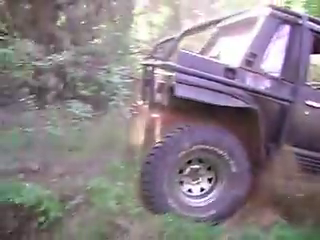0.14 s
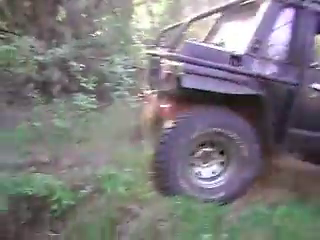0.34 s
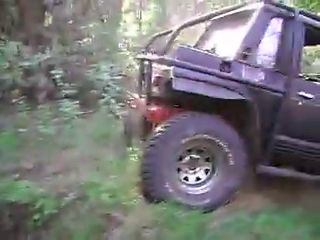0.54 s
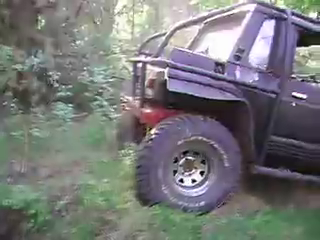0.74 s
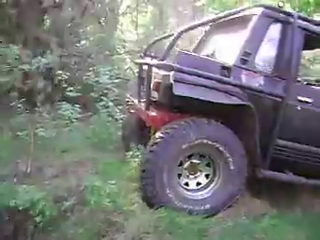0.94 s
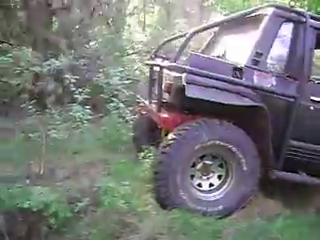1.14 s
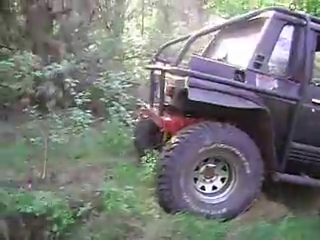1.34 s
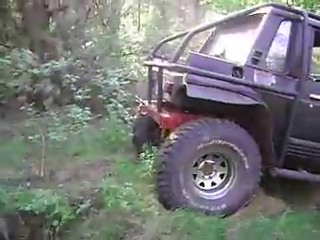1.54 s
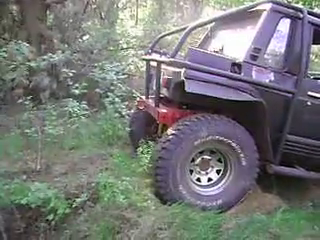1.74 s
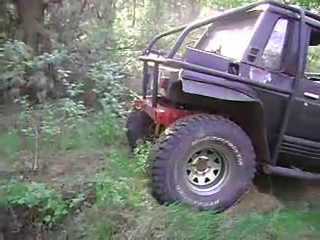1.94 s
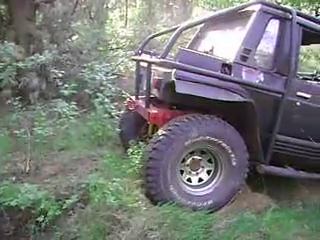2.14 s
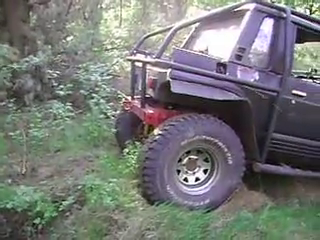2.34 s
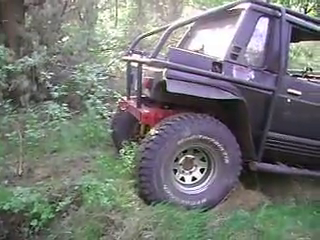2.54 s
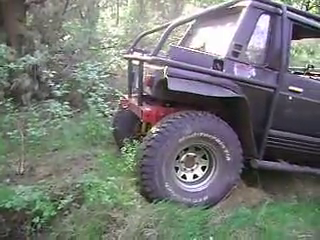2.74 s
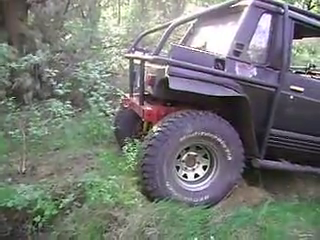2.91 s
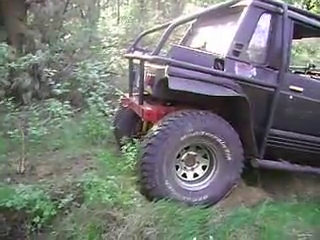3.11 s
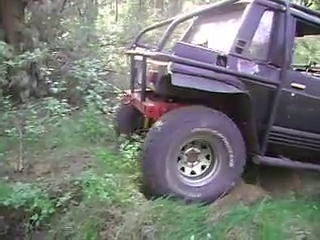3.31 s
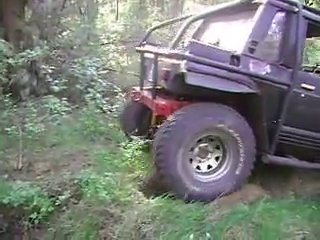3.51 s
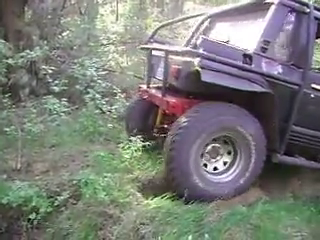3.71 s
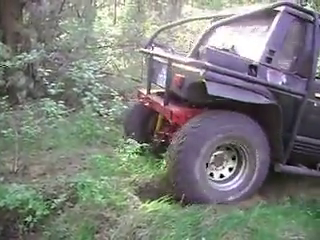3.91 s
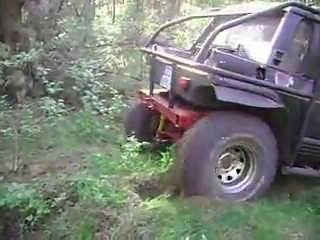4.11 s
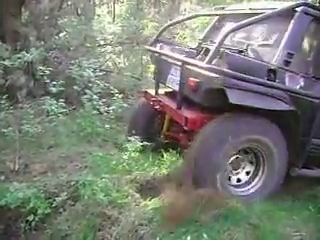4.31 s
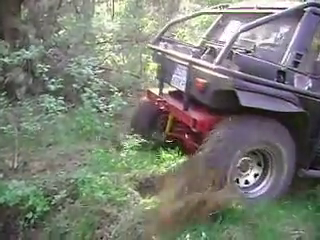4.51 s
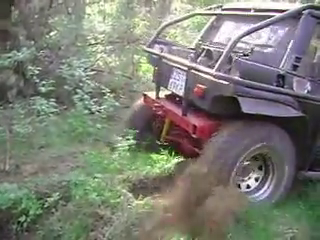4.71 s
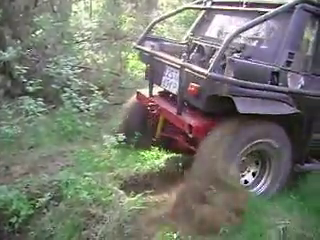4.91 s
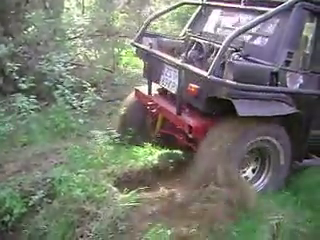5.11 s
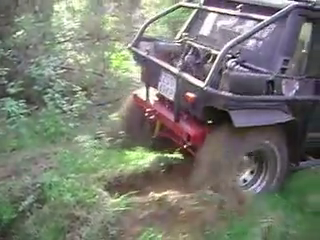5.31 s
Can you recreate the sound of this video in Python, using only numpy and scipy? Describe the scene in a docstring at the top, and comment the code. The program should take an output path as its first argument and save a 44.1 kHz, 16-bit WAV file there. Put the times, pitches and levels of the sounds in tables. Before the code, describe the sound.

A diesel off-road truck drops from a loud rev to a quiet low idle, then roars hard under load, spinning its wheels in dirt.

```python
"""A six-cylinder diesel truck in a forest drops off a rev to idle, then pulls hard and spins its wheels in mud.
Exhaust pulses, a sum of harmonics of the firing rate, drone through the pipe over a roar of noise bursts.
Each combustion excites resonances of the engine block and intake, one cylinder harder than the rest.
Mud splashes as swells of noise, and mud and twigs tick on the body as short wave packets.
A small mono recorder cuts the treble and overloads on the peaks."""
import sys
import numpy as np
from scipy import signal
from scipy.fft import rfft, irfft, next_fast_len
from scipy.io import wavfile
from scipy.ndimage import uniform_filter1d

SR = 44100
rng = np.random.default_rng(int(sys.argv[2]) if len(sys.argv) > 2 else 0)


def elevation(decibels):
    """Turn decibel levels (scalar or array-like) into linear amplitude ratios."""
    levels = np.asarray(decibels, float)
    return 10 ** (levels / 20)


def bounce(signal):
    """Save signal as a 16-bit WAV file at the path given by the first command-line argument."""
    frames = np.transpose(np.atleast_2d(signal))
    limited = np.clip(frames, -1, 1)
    pcm = np.round(limited * 32767).astype(np.int16)
    wavfile.write(sys.argv[1], SR, pcm)


N = 236111

# Engine speed. Each row: time in seconds, firings per second.
FIRING_RATE = [(0, 109.51), (.05, 105.2), (.12, 88.81), (.253, 76.64), (.531, 64.42), (1.201, 41.0),
               (1.485, 33.44), (1.689, 32.15), (1.933, 32.97), (2.789, 31.29), (2.909, 39.16),
               (3.112, 66.63), (3.258, 79.16), (3.382, 84.6), (3.604, 78.83), (3.782, 80.29), (4.331, 78.3),
               (4.631, 78.7), (4.885, 74.67), (5.354, 71.81)]
# Engine load. Each row: time in seconds, load from 0 to 1.
ENGINE_LOAD = [(0, 0), (2.8, 0), (3.0, 1), (5.354, 1)]
# Source levels before a fixed trim. Each row: time in seconds, exhaust tones in dB, exhaust roar in dB,
# block clatter in dB.
SOURCE_LEVELS = [(0, -29.5, -12.5, -16.5), (.09, -29.5, -20.5, -23.5), (.24, -41, -22.5, -28.5),
                 (.31, -37, -21.5, -27), (.45, -42.5, -28.5, -32.5), (.75, -45, -33, -35),
                 (1.15, -49.5, -37, -37.5), (1.26, -49, -38, -36.5), (1.47, -54, -40.5, -38),
                 (1.75, -55.5, -39, -38.5), (2.3, -48, -37.5, -38), (2.65, -45.5, -39, -38.5),
                 (2.8, -46.5, -36.5, -40), (2.97, -31.5, -30, -20), (3.07, -30.5, -25, -15),
                 (3.18, -24.5, -23.5, -16.5), (3.39, -26.5, -22.5, -18), (3.46, -32, -26.5, -25),
                 (3.63, -27, -25, -21.5), (3.74, -25.5, -24.5, -17), (4.3, -24, -24.5, -17),
                 (4.9, -24.5, -26, -16), (5.354, -25.5, -27, -18)]

# The main exhaust tones, in multiples of the firing rate.
TONE_MULTIPLES = [1, 1.5, 2, 3, 4]
# Balance of those tones. Each row: level coasting in dB, dB added under load,
# dB added as the pipe turns this way.
TONE_BALANCE = [(-1.3, 10, -5.5), (-4, 3.5, -3), (5, -2, 0.9), (2, -2.5, 4.5), (-1.5, -8, 2)]
# The silencer colours those tones. Each row: frequency in Hz, gain in dB.
SILENCER_GAIN = [(30, 0), (50, -3), (75, -3), (100, 3.5), (125, 4), (150, 0), (185, 1.4), (225, 4.5),
                 (270, -0.5), (330, 4.5), (440, -7.5)]
# The pipe mutes the higher tones, against the roar. Each row: frequency in Hz, gain in dB.
PIPE_GAIN = [(150, -6.5), (200, -5), (235, -10), (260, -37), (325, -10.5), (400, -28), (700, -29)]
# Single tones swell for a while, probably body panels humming along. Each row: multiple of the firing rate,
# centre in seconds, half-width in seconds, level in dB before the trim of the tones.
PANEL_HUM = [(10, 2.55, .32, -43.5), (2.5, .6, .17, -35), (4, .29, .08, -29), (3, .03, .06, -27),
             (3, .92, .13, -39), (3, 1.3, .08, -45), (4.6, 3.42, .13, -29), (4.65, 3.9, .35, -34),
             (2.5, 4.1, .6, -35)]
# Spectrum of the exhaust roar. Each row: frequency in Hz, relative level in dB per Hz.
ROAR_SPECTRUM = [(12, -51), (20, -22), (56, -4.5), (140, -4.5), (191, -1), (233, -4), (362, -4.5),
                 (602, -7.5), (937, -14), (1000, -11), (1300, -33), (2200, -120)]
TURN_START_S, TURN_S = 4.0, 1.35  # the truck slews round while the wheels spin
# The low rumble thins out when coasting above idle, and under load, where the tones take over.
IDLE_PER_S, COAST_PER_S = 32, 14  # firings per second
COAST_RUMBLE_DB, LOAD_RUMBLE_DB = -11, -2

# Spectrum of the metallic clatter and of the mud. Each row: frequency in Hz, relative level in dB per Hz.
CLATTER_SPECTRUM = [(410, -24), (700, -14), (946, -12), (1080, -14), (1280, -10), (1480, -10.5),
                    (2810, -9.5), (3320, -13), (4950, -17.5), (5800, -15.5), (7540, -60), (12800, -120)]
# Block modes, half of which swell as the truck turns. Each row: frequency in Hz, width in Hz,
# mean level in dB against the wide clatter, loudest moment in seconds, half-width in seconds.
BLOCK_MODES = [(1808, 11, -12.5, 3.37, .3), (1734, 130, -10, 5.2, 0.25), (1960, 71, -4.5, 4.49, 0.2),
               (2200, 98, -10.5, 3.97, 0.36), (2492, 45, -1.5, 3.05, 0.17), (2402, 29, -9.5, 4.35, 0.19),
               (2443, 48, -5.5, 5.4, 0.51), (2755, 52, -11, 4.57, 1.2), (2744, 60, -9, 3.1, 0.2),
               (2850, 85, -12, 4.74, 0.16), (2995, 61, -13.5, 5.03, 0.41), (2300, 160, -19.5, 1.9, 3.3),
               (2570, 140, -21.5, 1.83, 0.44), (4790, 170, -17, 5.7, 2.7), (2650, 220, -6, 0.03, 0.22),
               (1280, 500, -8.5, 3.95, 0.34)]
# Knock of each cylinder at full load, in dB, in firing order.
CYLINDER_KNOCK = [5, 0.5, 6, -15, 9.5, -2]
# Firings that knock harder or softer than usual. Each row: time in seconds, extra level in dB.
UNUSUAL_KNOCKS = [(2.943, 8.5), (3.025, 7.5), (3.058, 3.5), (3.23, 1.5), (3.449, 3), (3.526, -1),
                  (4.2, 6.5), (4.278, -1), (4.979, 4)]
# Pitch of the intake ring. Each row: time in seconds, frequency in Hz.
RING_PITCH = [(0, 1183), (2.6, 1170), (3.2, 1126), (3.58, 1168), (3.7, 1020), (4.15, 1058), (4.5, 1106),
              (5.354, 1085)]
# The intake ring flares or dips briefly. Each row: centre in seconds, half-width in seconds, change in dB.
RING_FLARES = [(.3, 0.017, 6.5), (.37, 0.033, -11), (3.2, .04, 4.5), (3.3, 0.025, -7), (3.39, 0.018, 3),
               (3.46, 0.024, -4)]
# Intake ring against the tabulated roar level; it builds a little after the load.
RING_DB, RING_LOAD_DB, RING_LAG_S = -7, 11, 0.31

# Clods of mud hit the wheel arch. Each row: centre in seconds, half-width in seconds, level in dB.
MUD_SPLASHES = [(0.154, 0.012, -19.5), (0.297, 0.0082, -19), (.33, 0.0038, -19.5), (0.352, 0.0015, -33),
                (1.305, 0.027, -31.5), (1.42, 0.0063, -41), (4.75, 0.018, -14.5)]
# Mud and twigs on the body. Each row: centre in seconds, level in dB, pitch in Hz, half-width in cycles.
BODY_TICKS = [(0.2672, -5, 432, 0.64), (.2948, -13, 2300, 1.1), (0.308, -13, 1190, 0.92),
              (0.757, -11, 3020, 0.57), (1.2232, -18, 1270, .9), (1.2287, -15, 1900, 0.61),
              (1.2517, -9.5, 3900, 0.57), (1.316, -22, 1145, 3.7), (1.3444, -13.5, 2800, 0.59),
              (1.3688, -17, 3600, 0.98), (1.549, -11, 3500, 1), (1.6626, -23, 4200, 1.4),
              (2.101, -22, 4300, 1), (2.28, -10, 3350, 0.61)]


def evened(x):
    """Normalisation: scales a signal to rms 1."""
    return x / np.sqrt(np.mean(x ** 2) + 1e-20)


def steady(x, seconds=0.1164):
    """Running normalisation: keeps the slow rms level at 1 whatever the firing rate."""
    return x / np.sqrt(uniform_filter1d(x ** 2, int(seconds * SR)) + 1e-12)


def read(points, hz):
    """Logarithmic interpolation: reads a spectrum on a log frequency axis."""
    f, value = np.transpose(points)
    return np.interp(np.log(hz + 1), np.log(f + 1), value)


def curves(rows):
    """Linear interpolation: one value a sample for each column."""
    s, *columns = np.transpose(rows)
    return [np.interp(np.arange(N) / SR, s, c) for c in columns]


def swell(s, seconds):
    """Gaussian envelope: a bell-shaped rise and fall."""
    return np.exp(-((np.arange(N) / SR - s) / seconds) ** 2)


def wander(seconds):
    """Smoothed noise: a slow random fluctuation of rms 1."""
    return evened(uniform_filter1d(rng.standard_normal(N), int(seconds * SR)))


def colour(x, points):
    """Spectral shaping: multiplies the Fourier transform by a gain curve, then scales to rms 1."""
    size = next_fast_len(N)
    gain = elevation(read(points, np.fft.rfftfreq(size, 1 / SR)))
    return evened(irfft(rfft(x, size) * gain, size)[:N])


def resonate(x, hz, width):
    """Heterodyne resonance: shifts the curve hz down to zero, smooths, and shifts back, with gain 1."""
    turn = np.exp(2j * np.pi * np.cumsum(hz * np.ones(N)) / SR)
    r = np.exp(-np.pi * width / SR)
    smooth = signal.lfilter([1 - r], [1, -r], x / turn)
    return 2 * (turn * smooth).real


def bursts(turns, lag, pattern_db, spread_db, t60, floor):
    """Impulsive excitation: noise jumps at each firing and decays exponentially to a steady floor."""
    count = np.floor(turns - lag).astype(int)
    at = np.flatnonzero(np.diff(count)) + 1
    chance_db = spread_db * rng.standard_normal(400)[:len(at)]
    kicks = np.zeros(N)
    kicks[at] = elevation(pattern_db[count[at] % 6, at] + chance_db)
    fall = np.exp(-np.log(1000) / (t60 * SR))
    envelope = floor + signal.lfilter([1], [1, -fall], kicks)
    return envelope * rng.standard_normal(N)


def exhaust_tones(rate, turns, load, tone_db, roar_db):
    """Fourier synthesis: harmonics add up to one pulse a firing; unequal manifolds add the half order."""
    angle = 2 * np.pi * (turns - .55)
    spread = .23 * (1 - load)  # light pulses leave the pipe drawn out, heavy ones as a sharp peak
    turned = np.clip((np.arange(N) / SR - TURN_START_S) / TURN_S, 0, 1)
    main_db = []
    for k, (db, load_db, turn_db) in zip(TONE_MULTIPLES, TONE_BALANCE):
        balance_db = db + load_db * load + turn_db * turned
        main_db.append(tone_db + balance_db + read(SILENCER_GAIN, k * rate))
    first_db, half_db, second_db, third_db, fourth_db = main_db
    upper_db = [roar_db + read(PIPE_GAIN, k * rate) for k in range(5, 10)]
    pulses = elevation(half_db) * np.sin(1.5 * angle)
    for k, db in enumerate([first_db, second_db, third_db, fourth_db] + upper_db, 1):
        unsteady = (.011 - .006 * load) * k * k * wander(.05)  # phase in radians
        level_db = db + (.45 - .3 * load) * k * wander(.12)
        pulses = pulses + elevation(level_db) * np.cos(k * angle - spread * k * k + unsteady)
    for k, s, span, db in PANEL_HUM:
        pulses = pulses + elevation(db) * swell(s, span) * np.cos(k * angle - spread * k * k)
    return np.sqrt(2) * elevation(1.0) * pulses


def exhaust_roar(rate, turns, load, roar_db):
    """Flow noise: bursts at each firing, filtered, with a rumble that depends on speed and load."""
    roar = steady(colour(bursts(turns, 0.51, np.zeros((6, N)), 4.8, 0.054, 5.7), ROAR_SPECTRUM))
    low = signal.sosfiltfilt(signal.butter(2, 210, fs=SR, output="sos"), roar)
    above_idle = 1 - np.exp(-np.maximum(rate - IDLE_PER_S, 0) / COAST_PER_S)
    rumble_db = COAST_RUMBLE_DB * (1 - load) * above_idle + LOAD_RUMBLE_DB * load
    roar = roar - low + elevation(rumble_db) * low
    return elevation(roar_db + 2.5) * roar


def knock_levels(load):
    """Combustion unevenness: the knock in dB by cylinder and sample; cylinders differ more under load."""
    knock_db = np.outer(CYLINDER_KNOCK, .35 + .65 * load) - 4 * (1 - load)
    return knock_db + sum(db * swell(s, .006) for s, db in UNUSUAL_KNOCKS)


def block_clatter(turns, knock_db, clatter_db):
    """Modal excitation: combustion knocks shake the block's modes and a wide metallic clatter."""
    knocks = steady(bursts(turns, .3, knock_db, 1.7, .05, .65))
    modes = np.zeros(N)
    for hz, width, db, s, span in BLOCK_MODES:
        level = elevation(db + 4.8 * wander(.15)) * swell(s, span)
        modes = modes + level * evened(resonate(knocks, hz, width))
    return elevation(clatter_db + .5) * steady(colour(knocks, CLATTER_SPECTRUM) + modes)


def intake_ring(turns, load, knock_db, roar_db):
    """Driven resonance: firings ring the intake, which follows the roar and builds up with the load."""
    lag = np.exp(-1 / (RING_LAG_S * SR))
    built = signal.lfilter([1 - lag], [1, -lag], load) ** 2
    flare_db = sum(db * swell(s, span) for s, span, db in RING_FLARES)
    ring_db = roar_db + RING_DB + RING_LOAD_DB * built + flare_db
    ring_hz, = curves(RING_PITCH)
    shakes = bursts(turns, 0.15, 0.56 * knock_db, 2.7, 0.062, 1.0)
    narrow = resonate(shakes, ring_hz, 540)
    return elevation(ring_db) * steady(resonate(narrow, ring_hz, 85))


def mud():
    """Broadband impact noise: short hissing splashes under Gaussian envelopes."""
    level = sum(elevation(db) * swell(s, span) for s, span, db in MUD_SPLASHES)
    return level * colour(rng.standard_normal(N), CLATTER_SPECTRUM)


def ticks():
    """Wave packets: each click is a sine of a few cycles under a Gaussian envelope."""
    out = np.zeros(N)
    for s, db, hz, cycles in BODY_TICKS:
        u = np.arange(-400, 400) / SR * hz  # in cycles
        click = np.sin(2 * np.pi * u) * np.exp(-(u / cycles) ** 2)
        out[round(s * SR) - 400:][:800] += elevation(db) * click
    return out


def scene():
    """Superposition: exhaust, block, intake, mud and ticks add at the microphone."""
    rate, = curves(FIRING_RATE)
    turns = np.cumsum(rate) / SR  # firings so far
    load, = curves(ENGINE_LOAD)
    tone_db, roar_db, clatter_db = curves(SOURCE_LEVELS)
    knock_db = knock_levels(load)
    engine = exhaust_tones(rate, turns, load, tone_db, roar_db) + exhaust_roar(rate, turns, load, roar_db)
    engine = engine + block_clatter(turns, knock_db, clatter_db)
    engine = engine + intake_ring(turns, load, knock_db, roar_db)
    return (engine + mud() + ticks())[None]


def top_cut(x):
    """Nothing passes above about 15.8 kHz."""
    return signal.sosfilt(signal.butter(12, 15800, fs=SR, output="sos"), x)


def record(dry):
    """Saturation and band limiting: the microphone stage squeezes peaks, a low-pass cuts, overload clips."""
    squeezed = 1.3 * np.tanh(dry / 1.3)
    lowpass = signal.firwin(161, 5550, window=("kaiser", 9), fs=SR)
    narrow = signal.oaconvolve(squeezed, lowpass[None], "same")
    clipped = np.clip(narrow, -.71, .71)
    return top_cut(clipped)


dry = scene()
out = record(dry)
bounce(out)
```